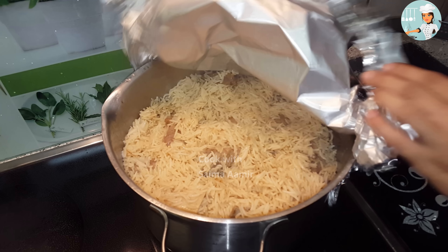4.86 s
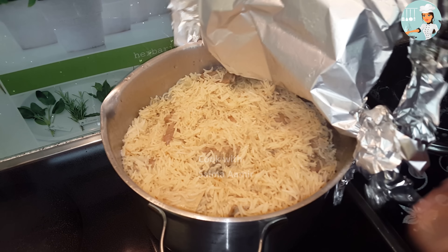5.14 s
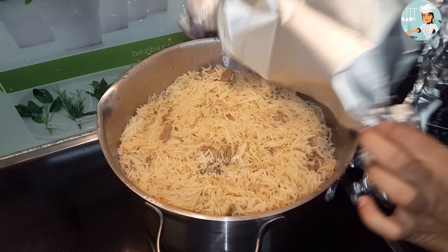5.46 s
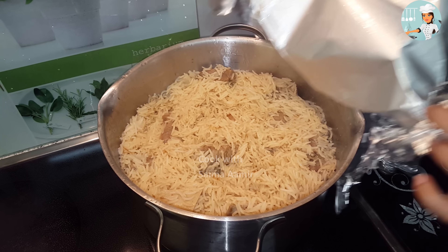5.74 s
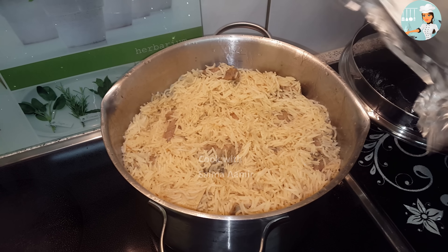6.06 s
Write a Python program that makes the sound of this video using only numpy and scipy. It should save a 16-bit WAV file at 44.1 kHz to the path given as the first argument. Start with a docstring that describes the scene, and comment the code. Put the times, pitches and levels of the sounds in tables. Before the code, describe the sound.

A glass pot lid knocks, rings and settles, then aluminium foil crinkles and snaps as it is peeled from the pot.

```python
"""Over a soft microphone hiss and a faint mains hum, a glass pot lid is knocked off its pot.
It bounces and rings, judders along the steel rim and settles. Then aluminium foil is peeled
from the pot in several pulls: its creases crackle and snap, tight stretches ring as they are
scraped, and its panels buckle with dull pops. A small kitchen adds a short echo."""
import sys
import numpy as np
from scipy import signal
from scipy.fft import rfft, irfft, next_fast_len
from scipy.io import wavfile
from scipy.ndimage import uniform_filter1d

SR = 44100
rng = np.random.default_rng(int(sys.argv[2]) if len(sys.argv) > 2 else 0)


def file_out(sig):
    """Save sig as 16-bit WAV at sys.argv[1]."""
    # one column per channel
    cols = np.atleast_2d(sig).T
    # limit, then scale
    lim = np.clip(cols, -1, 1)
    pcm = np.round(lim * 32767).astype(np.int16)
    wavfile.write(sys.argv[1], SR, pcm)


N = 277389
TIME = np.arange(N) / SR

# Levels in the tables are relative. A ring_s is the time a sound takes to fade by 60 dB.
# The tone of the microphone hiss: frequency_hz, level_db
HISS_SPECTRUM = [(20, -28), (30, -10), (60, -18), (95, -16), (130, -9.5), (280, -18.5), (600, -15),
                 (1000, -12.5), (1300, -15), (2200, -10.5), (5000, -11), (7000, -12.5), (9500, -10.5),
                 (13000, -13), (16000, -20.5)]
# The tones of the mains hum: pitch_hz, level_db
HUM_TONES = [(101, -66), (200, -72.5)]
# The main blows of the lid (a high cutoff is a hard hit): start_s, level_db, cutoff_hz, bass_db
LID_BLOWS = [(0.692, -10.5, 5000, 0.5), (0.8063, -16.5, 5830, -3.5), (0.904, -27.5, 1200, 2),
             (0.984, -27, 700, 10), (.9965, -25.5, 7000, -5), (1.0422, -17.5, 10100, 0),
             (1.104, -29, 4500, 5), (1.153, -28.5, 2200, 6), (1.28, -44, 980, -23)]
# The tones at which lid and pot ring together: pitch_hz, level_db, ring_s
LID_TONES = [(124.6, -11.5, 0.54), (145.9, -7.5, 0.29), (207, 0, 0.12), (255, -13.5, 0.097),
             (314, -18, 0.15), (385, -13, 0.15), (446, -12.5, .18), (554, -18, 0.17), (661, 2.5, 0.17),
             (713, -2.5, 0.33), (736, -26, 0.18), (821, 0, 0.053), (860, -13, 0.18), (938, -9, 0.25),
             (1001, -9, 0.26), (1113, -10.5, 0.12), (1300, -11, .16), (1660, -6, 0.095), (1746, -6, 0.14),
             (1880, -4.5, 0.15), (2000, -33, .15), (2600, -3.5, 0.13), (2680, -3, 0.11), (3370, -22, .14),
             (4480, -6, 0.1), (4650, -11.5, 0.14), (4970, -10.5, 0.12), (5960, -22, .06), (7160, -24, .07)]
# The dense clatter between those tones: frequency_hz, level_db
CLATTER_SPECTRUM = [(40, -16), (80, -22), (130, -7), (220, 0.5), (480, -5), (750, 3.5), (1300, -4.5),
                    (2600, -5.5), (4900, -5.5), (5800, -15.5), (9500, -16), (15000, -38)]
# How long the clatter lasts: frequency_hz, ring_s
CLATTER_RING_TIMES = [(100, 0.25), (700, 0.19), (2500, 0.16), (5000, 0.07), (12000, 0.14)]
# The tones of the dragged rim: pitch_hz, level_db, ring_s
RIM_TONES = [(213, -18, 0.091), (370, -7, 0.115), (494, -31, 0.043), (560, -2, 0.078), (600, -3.5, 0.12),
             (706, -20, 0.036), (774, 9, 0.057), (836, -13, 0.049), (906, -4, 0.19), (2500, 4, 0.0092),
             (2950, 5.5, 0.0076), (3530, 8, 0.0041)]
# Pulls on the foil (flex and fizz are relative to the crackle):
# start_s, rise_s, hold_s, fade_s, crackle_db, flex_db, fizz_db
FOIL_PULLS = [(1.948, 0.091, 0.078, .08, -33.5, -7, -2), (2.43, 0.026, 0.05, 0.024, -42, -9, 0),
              (2.68, 0.019, 0.096, 0.076, -32.5, -8.5, -2), (2.856, 0.014, 0.036, 0.12, -34.5, -2.5, -1.5),
              (3.111, 0.013, 0.04, 0.029, -45, 2.5, 0), (3.309, 0.013, .01, 0.049, -44, 4.5, -3),
              (3.391, 0.0055, 0.021, 0.027, -38, -20, 4), (3.488, 0.0083, 0.032, 0.036, -43, -6, 5.5),
              (3.597, 0.0096, 0.17, 0.099, -32.5, -3, 0), (3.706, 0.039, 0.017, 0.015, -36, 7.5, -6),
              (3.9, 0.014, 0.066, 0.036, -47, -3, -9), (4.072, 0.0088, 0.017, 0.036, -40, -2, -3),
              (4.173, 0.028, 0.05, 0.056, -39.5, -3.5, -3.5), (4.518, 0.029, 0.025, 0.032, -35, -3, -2.5),
              (4.594, 0.031, 0.092, 0.056, -31.5, -4.5, -3.5), (4.764, 0.018, .005, 0.062, -32.5, -1, -15),
              (4.865, 0.018, 0.052, 0.075, -34.5, -2, -2), (4.914, 0.027, 0.0065, 0.031, -30, -4, -11.5),
              (5.021, 0.011, 0.056, 0.18, -37.5, -9.5, -0.5), (5.344, 0.02, 0.14, .06, -40, -10, -3),
              (5.468, 0.035, 0.022, 0.098, -37.5, -2.5, -6), (5.724, 0.015, 0.12, 0.028, -39, -6, 0.5),
              (5.832, 0.014, .01, 0.016, -36.5, -16, -1), (5.998, .015, .01, .04, -46, -2, 4.5),
              (6.105, 0.013, 0.12, 0.084, -39, -8.5, -0.5)]
# The tone of small creases: frequency_hz, level_db
CREASE_SPECTRUM = [(200, -42), (600, -9.5), (1000, -7), (1400, -4), (2000, -5.5), (3200, -5.5),
                   (4200, -7.5), (7000, -8), (9300, -7), (10500, -9.5), (12600, -7), (16000, -14.5)]
# The tone of the whole sheet as it flexes: frequency_hz, level_db
SHEET_SPECTRUM = [(20, -42), (50, -7.5), (90, -1), (145, 4.5), (185, 0.5), (230, 2), (320, 4.5), (480, -5),
                  (600, 5.5), (800, -2), (1100, -2), (1600, -18), (3000, -13.5)]
# Scrapes on tightly stretched foil: start_s, hold_s, pitch_hz, level_db
TAUT_SCRAPES = [(1.782, .02, 2300, -44.5), (1.989, 0.13, 2120, -37.5), (2.42, 0.33, 2500, -51),
                (5.72, .11, 2330, -42.5), (6.13, .15, 2370, -49)]
# The main creases that snap: start_s, level_db, left_over_right_db
CREASE_SNAPS = [(1.894, -20, 2), (1.952, -24, 10), (2.0636, -15.5, 0), (2.1023, -12, 1), (2.2044, -18, 0),
                (2.238, -16, .5), (2.283, -22, -3), (2.3196, -25, -1), (2.422, -28, -1), (2.446, -22, -1.5),
                (2.557, -21.5, 2.5), (2.708, -11.5, -2), (2.7215, -15, 5), (2.7824, -18, -6),
                (2.8445, -16, -2), (2.8883, -17.5, 8), (2.9417, -20, 1), (2.9627, -18, 0),
                (3.122, -21.5, 1), (3.21, -24, -1), (3.259, -22.5, 0), (3.395, -14, -2), (3.469, -22, 1),
                (3.576, -19, 1), (3.609, -17.5, 9), (3.795, -23, 7), (3.945, -22, 2), (3.9995, -22.5, 2),
                (5.5386, -16.5, 2.5), (5.649, -20.5, -3), (5.77, -24, -9), (5.8407, -20, -12),
                (6.2267, -36, -11)]
# Foil panels that buckle, plus one low thump of the pot on the hob (the 136 Hz row at 3.733 s): start_s,
# level_db, pitch_hz, fade_cycles
PANEL_POPS = [(2.0273, -13, 1870, 1.7), (2.121, -15, 2060, 4), (2.721, -15, 1120, 3.1),
              (3.169, -17, 960, 1.6), (3.295, -21, 1300, 2), (3.3227, -22, 625, 1.1),
              (3.396, -19, 1370, 4.6), (3.733, -22, 136, 1.7), (3.757, -26.5, 301, 5.7),
              (3.921, -20, 765, 0.98), (4.151, -19.5, 1730, 13), (4.635, -16.5, 848, 6),
              (4.673, -14.5, 764, 7.7), (4.8824, -12, 820, 3.5), (4.95, -17, 910, 4), (5.06, -21, 953, 5.5),
              (5.499, -19.5, 600, 0.57), (5.998, -30, 216, 3.2), (6.06, -27, 696, 1.6)]
# How long the kitchen echoes: frequency_hz, ring_s
KITCHEN_RING_TIMES = [(120, 0.39), (600, 0.33), (3000, 0.35), (8000, 0.42), (15000, 0.24)]
# How alike left and right are (1 is identical): frequency_hz, likeness
STEREO_LIKENESS = [(60, 0.62), (140, 1), (300, 0.78), (650, 0.7), (1400, 0.34), (3000, 0.11), (15000, 0.09)]

FOIL_START_S = 1.78


def amp(db):
    """Turns decibels into a gain."""
    return 10 ** (np.asarray(db) / 20)


def unit_rms(x):
    """Scales a signal to an average (rms) level of one."""
    return x / np.sqrt(np.mean(x ** 2) + 1e-20)


def look_up(table, hz):
    """Reads a table at any frequency, joining its rows by lines on a log axis."""
    frequencies, values = np.transpose(table)
    return np.interp(np.log(hz + 1), np.log(frequencies), values)


def add(mix, start_s, sound):
    """Mixes in a stereo sound at start_s."""
    part = mix[:, round(start_s * SR):][:, :sound.shape[1]]
    part += sound[:, :part.shape[1]]


def panned(db):
    """Left and right gains, with the left louder by db."""
    return amp(np.array([[db], [-db]]) / 2)


def aside(x, lead_s):
    """Sound from one side reaches the left microphone earlier by lead_s."""
    size = 2 * next_fast_len(N)
    delay = np.exp(-2j * np.pi * np.fft.rfftfreq(size, 1 / SR) * lead_s)
    return np.array([x[0], irfft(rfft(x[1], size) * delay)[:N]])


def convolved(x, response):
    """Every sample of x sets off a copy of the response."""
    return signal.oaconvolve(np.atleast_2d(x), response, axes=1)[:, :N]


def lowpass(x, hz, order=2):
    """Softens everything above hz."""
    return signal.lfilter(*signal.butter(order, hz, fs=SR), x)


def highpass(x, hz, order=2):
    """Softens everything below hz."""
    return signal.lfilter(*signal.butter(order, hz, "high", fs=SR), x)


def coloured(x, spectrum, size=2048):
    """Shapes the tone of x with a filter that keeps clicks sharp (minimum phase)."""
    log_gain = np.log(amp(look_up(spectrum, abs(np.fft.fftfreq(size, 1 / SR)))))
    response = np.exp(np.conj(signal.hilbert(log_gain)))
    taps = np.fft.ifft(response).real[:size // 2]
    return convolved(x, taps[None] / np.linalg.norm(taps))


def stereo_noise(size, tint_db=0, bands=40):
    """Noise whose two sides are alike only in the bass; tint_db colours it at random."""
    hz = np.fft.rfftfreq(size, 1 / SR)
    tint = np.interp(np.sqrt(hz), np.linspace(0, np.sqrt(SR / 2), bands), rng.standard_normal(bands))
    left, unrelated = rfft(rng.standard_normal((2, size))) * unit_rms(amp(tint_db * tint))
    likeness = look_up(STEREO_LIKENESS, hz)
    right = likeness * left + np.sqrt(1 - likeness ** 2) * unrelated
    return irfft(np.array([left, right]), size)


def fading_noise(ring_times, size=SR // 2):
    """Stereo noise in which each band fades at its own speed."""
    spectrum = rfft(stereo_noise(size))
    hz, t = np.fft.rfftfreq(size, 1 / SR), np.arange(size) / SR
    centres, rings_s = np.transpose(ring_times)
    bands = [np.interp(np.log(hz + 1), np.log(centres), row) for row in np.eye(len(centres))]
    return sum(irfft(spectrum * band, size) * np.exp(-np.log(1000) * t / ring_s)
               for band, ring_s in zip(bands, rings_s))


def ringing(tones, spread_db, detune=0.0063, size=SR // 2):
    """The fading tones of one hit, each a little different in level and pitch every time."""
    hz, db, ring_s = np.transpose(tones)
    weight, phase, side, shift = rng.standard_normal((4, len(hz)))
    step = np.exp((2j * np.pi * hz * (1 + detune * shift) - np.log(1000) / ring_s) / SR)
    waves = np.cumprod(np.broadcast_to(step[:, None], (len(hz), size)), axis=1)
    # high tones reach the two microphones out of step
    apart = np.exp(.5j * np.sign(side) * np.arccos(look_up(STEREO_LIKENESS, hz)))
    strength = amp(db + spread_db * weight) * np.exp(1j * phase)
    return (np.array([strength * apart, strength / apart]) @ waves).imag


def stroke(start_s, rise_s, hold_s, fade_s):
    """The loudness of one movement: it rises, holds and dies away."""
    t = TIME - start_s
    return np.clip(t / rise_s, 0, 1) * np.exp(-np.clip((t - rise_s - hold_s) / fade_s, 0, 20))


def hiss_and_hum(hiss_db=-46.5):
    """The microphone hisses steadily and the mains hums faintly."""
    hum = sum(amp(db) * np.sqrt(2) * np.sin(2 * np.pi * (hz * TIME + rng.random()))
              for hz, db in HUM_TONES)
    hiss = unit_rms(coloured(stereo_noise(N), HISS_SPECTRUM))
    return amp(hiss_db) * hiss * panned(2.6) + hum


def lid_contacts(rocks=16, rock_every_s=.03, jitter_s=.004, fade_db_per_s=9.5):
    """Lists every touch of lid on pot, in the same columns as LID_BLOWS."""
    # after each blow the far edge lands too, softer and heavier
    rebounds = [(start_s + .007, db - 5, 2200, bass_db + 5) for start_s, db, _, bass_db in LID_BLOWS]
    # between blows the lid rocks in weak, dull, uneven taps
    times = rock_every_s * np.arange(rocks) + jitter_s * rng.standard_normal(rocks)
    rocking = [(.724 + t, -27.5 - fade_db_per_s * t, 1120, 5.5) for t in times]
    return list(LID_BLOWS) + rebounds + rocking


def lid_knocks(tones_db=-4, clatter_db=1, bass_hz=280):
    """Each touch rings glass and steel; soft ones are dull, heavy ones thud into the hob."""
    out = np.zeros((2, N))
    for start_s, db, cutoff_hz, bass_db in lid_contacts():
        clatter = coloured(fading_noise(CLATTER_RING_TIMES), CLATTER_SPECTRUM)[:, :SR // 2]
        blow = amp(tones_db) * ringing(LID_TONES, spread_db=1.5) + amp(clatter_db) * clatter
        bass = lowpass(blow, bass_hz, order=1)
        blow = (blow - bass) * panned(-1.5) + amp(bass_db) * bass
        add(out, start_s, amp(db) * lowpass(blow, cutoff_hz, order=1))
    return highpass(out, 95, order=4)  # a pot is too small to give off deep bass


def rim_judder(slips_per_s=420, level_db=-17.5):
    """The lid's rim sticks and slips unevenly on the steel in one short drag."""
    wobble = unit_rms(uniform_filter1d(rng.standard_normal(N), 90))
    slips_so_far = np.floor(np.cumsum(slips_per_s * np.exp(.5 * wobble)) / SR)
    slips = np.diff(slips_so_far, prepend=0) * rng.uniform(0.46, 1, N)
    scrape = convolved(slips - slips.mean(), ringing(RIM_TONES, spread_db=0.5))
    scrape = highpass(lowpass(scrape, 4300), 140)
    # even out the scrape so that the hand's pressure alone sets the level
    scrape /= np.sqrt(uniform_filter1d((scrape ** 2).mean(0), 500) + 1e-9)
    pressure = stroke(start_s=.9815, rise_s=0.0014, hold_s=0.06, fade_s=0.0097)
    return amp(level_db) * scrape * pressure * panned(-2)


def crackle(flips_per_s, spread_db, tick_s, facets=18, runs_per_s=110):
    """Tiny faces (facets) of foil flip in runs; each run stirs two, each with its own tick."""
    t = np.arange(SR // 40) / SR
    run_number = np.cumsum(rng.random(N) < runs_per_s / SR)
    sizes = amp(spread_db * np.minimum(rng.exponential(1, N), 4))
    flips = sizes * (rng.random(N) < flips_per_s / SR) * rng.choice([-1, 1], N)
    which_facet = (rng.integers(0, facets, N)[run_number] + rng.integers(0, 2, N)) % facets
    out = np.zeros((2, N))
    for facet in range(facets):
        tick = unit_rms(stereo_noise(len(t), tint_db=2.5) * np.exp(-t / tick_s))
        out += convolved(flips * (which_facet == facet), tick * panned(0.73 * rng.standard_normal()))
    return unit_rms(out)


def foil_rustle(crackle_gain, fizz_gain, flex_gain, split_hz=5700, flicker_s=.022):
    """Small creases crackle and fizz in fits and starts; the flexing sheet rustles lower down."""
    creases = coloured(crackle(flips_per_s=2300, spread_db=0, tick_s=0.0011), CREASE_SPECTRUM)
    coarse = unit_rms(lowpass(creases, split_hz, order=3))
    fine = unit_rms(highpass(creases, split_hz, order=3))
    sheet = unit_rms(coloured(crackle(flips_per_s=900, spread_db=3, tick_s=0.0065), SHEET_SPECTRUM))
    flicker = np.interp(TIME / flicker_s, np.arange(1000), rng.standard_normal(1000))
    return (crackle_gain * coarse * amp(0.5 * flicker)
            + fizz_gain * fine * amp(1.44 * flicker)
            + flex_gain * sheet)


def taut_foil(width_hz=220, rise_s=0.014, fade_s=0.019):
    """Scraping makes the stretched foil ring in one broad band around a pitch."""
    scrape = stereo_noise(N)
    out = np.zeros((2, N))
    for start_s, hold_s, hz, db in TAUT_SCRAPES:
        pole = np.exp((2j * np.pi * hz - np.pi * width_hz) / SR)
        ring = signal.lfilter([1], [1, -2 * pole, pole * pole], scrape).real  # a steep resonance
        out += amp(db) * stroke(start_s, rise_s, hold_s, fade_s) * unit_rms(ring)
    return out


def stray_snaps(crackle_gain, count=45, boost_db=15.5, spread_db=0.5):
    """Lists extra snaps at random times; the harder the pull just then, the louder they are."""
    times = FOIL_START_S + (N / SR - FOIL_START_S) * (np.arange(count) + rng.random(count)) / count
    size, pan_db = rng.standard_normal((count, 2)).T
    pull_db = 20 * np.log10(np.interp(times, TIME, crackle_gain) + 1e-9)
    return list(zip(times, pull_db + boost_db + spread_db * size, pan_db))


def crease_snaps(crackle_gain, rise_s=0.0011, fade_s=0.0074, roughness_db=3):
    """A crease gives way in a bright run of ticks that dies within milliseconds."""
    out, t = np.zeros((2, N)), np.arange(SR // 12) / SR
    envelope = (1 - np.exp(-t / rise_s)) * np.exp(-t / fade_s)
    for start_s, db, pan_db in stray_snaps(crackle_gain) + list(CREASE_SNAPS):
        noise = stereo_noise(len(t), tint_db=3)
        spikes = amp(roughness_db * np.minimum(rng.exponential(1, len(t)), 4))
        add(out, start_s, amp(db) * panned(pan_db) * unit_rms(noise * spikes) * envelope)
    return amp(-6) * highpass(coloured(out, CREASE_SPECTRUM), 1200, order=1)


def panel_pops(gain_db=-3, rattle_db=-5, rattle_s=0.0042):
    """A panel flips over, or the pot thumps on the hob: a few cycles at its own pitch, and a dry rattle of the
    foil around it."""
    out, t = np.zeros((2, N)), np.arange(SR // 8) / SR
    for start_s, db, hz, cycles in PANEL_POPS:
        stereo_phase = np.arccos(look_up(STEREO_LIKENESS, hz)) * np.array([[.5], [-.5]])
        envelope = (1 - np.exp(-2 * hz * t)) * np.exp(-hz * t / cycles)
        panel = np.sin(2 * np.pi * hz * t + stereo_phase) * envelope
        noise = highpass(lowpass(stereo_noise(len(t)), hz + 1300), hz / 3)
        rattle = unit_rms(noise) * np.exp(-t / rattle_s)
        add(out, start_s, amp(db + gain_db) * (panel + amp(rattle_db) * rattle))
    return highpass(out, 110)


def kitchen(x, echo_db, build_s=0.0035):
    """Hob, tiles and cupboards send back a short, blurred echo."""
    tail = fading_noise(KITCHEN_RING_TIMES)
    t = np.arange(tail.shape[1]) / SR
    tail *= 1 - np.exp(-(t / build_s) ** 2)
    return x + amp(echo_db) * convolved(x, tail / np.linalg.norm(tail[0]))


def pull_strength(handling_db=(-45, -47.5, -53), rise_s=0.0062):
    """Gains of crackle, fizz and flexing over time; between pulls the held foil never quite rests."""
    handling = np.clip((TIME - FOIL_START_S) / rise_s, 0, 1)
    power = np.outer(amp(handling_db), handling) ** 2
    for *timing, db, flex_db, fizz_db in FOIL_PULLS:
        power += np.outer(amp([db, db + fizz_db, db + flex_db]), stroke(*timing)) ** 2
    return np.sqrt(power)


def scene():
    """The lid a little to the right, then the foil a little to the left, in the kitchen."""
    lid = kitchen(aside(lid_knocks() + rim_judder(), lead_s=-0.00018), echo_db=-10.5)
    crackle_gain, fizz_gain, flex_gain = pull_strength()
    peeling = foil_rustle(crackle_gain, fizz_gain, flex_gain) + taut_foil() + crease_snaps(crackle_gain)
    foil = kitchen(peeling, echo_db=-7.5) + kitchen(panel_pops(), echo_db=-4.5)
    return lid + aside(foil, lead_s=.00012) + hiss_and_hum()


def record(dry, treble_hz=6500, left_brighter_db=2, top_hz=16050):
    """The left microphone is a little brighter, loud peaks are rounded and the top treble is cut."""
    low = lowpass(dry, treble_hz, order=1)
    rounded = np.tanh(low + (dry - low) * panned(left_brighter_db))
    top_cut = signal.firwin(511, top_hz, window=("kaiser", 9), fs=SR)
    return signal.oaconvolve(rounded, top_cut[None], "same")


dry = scene()
out = record(dry)
file_out(out)
```